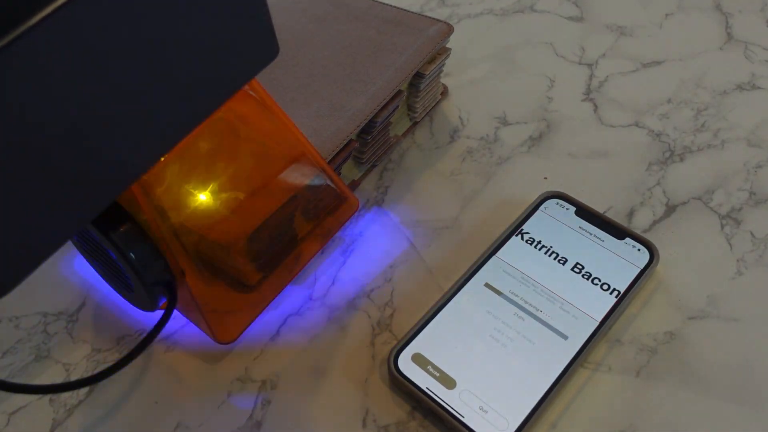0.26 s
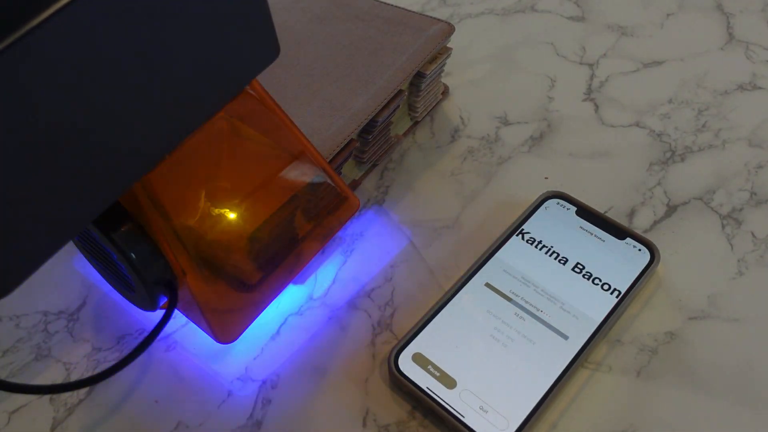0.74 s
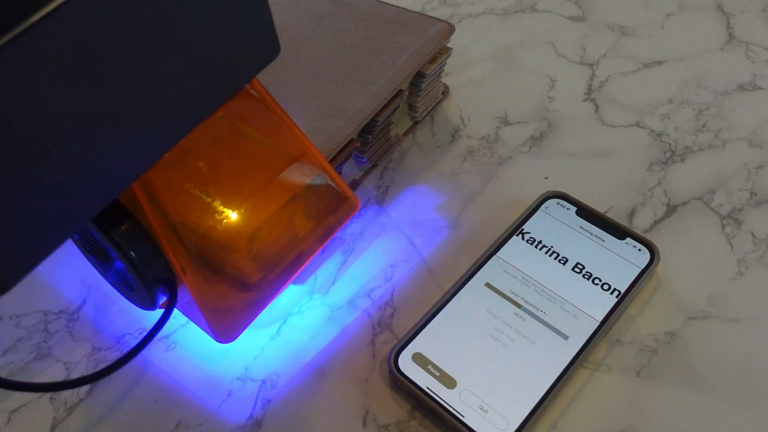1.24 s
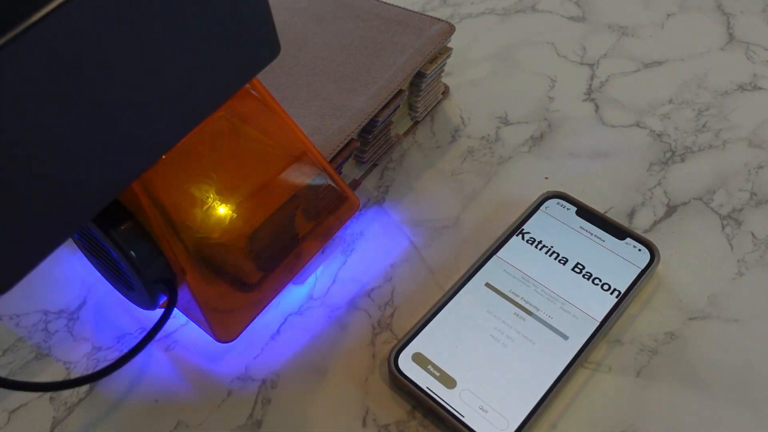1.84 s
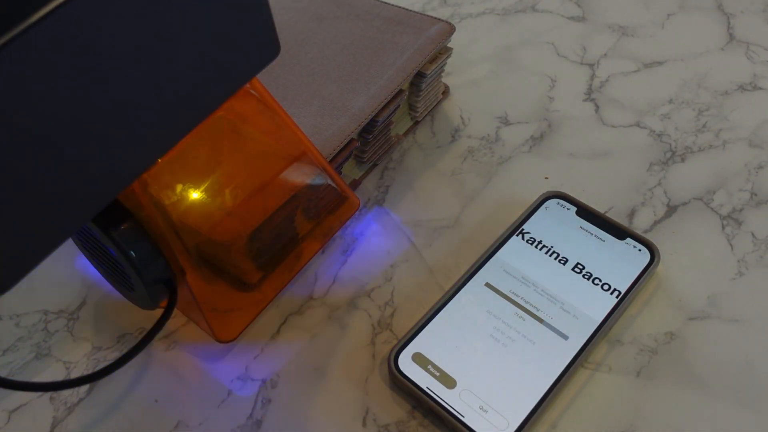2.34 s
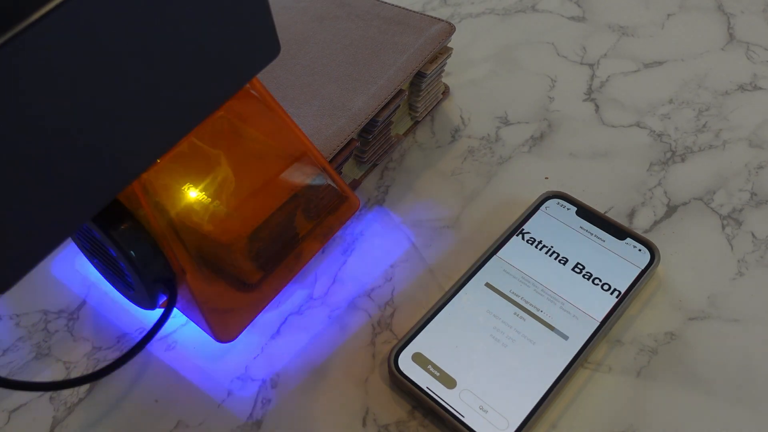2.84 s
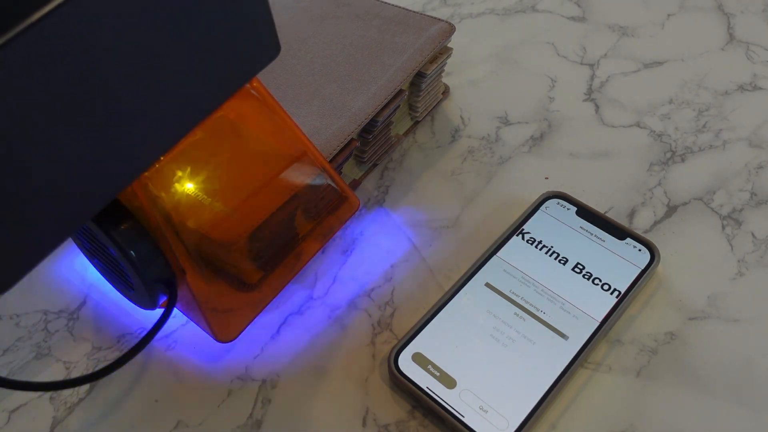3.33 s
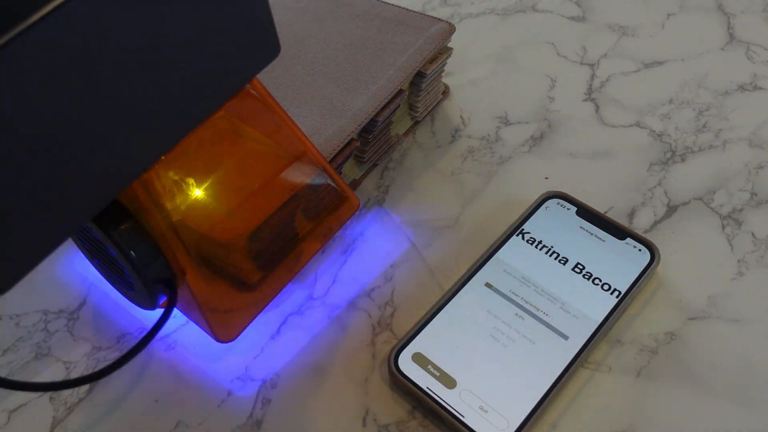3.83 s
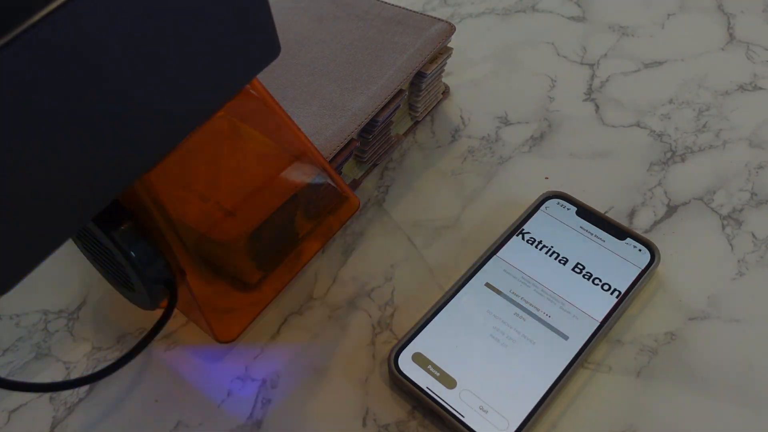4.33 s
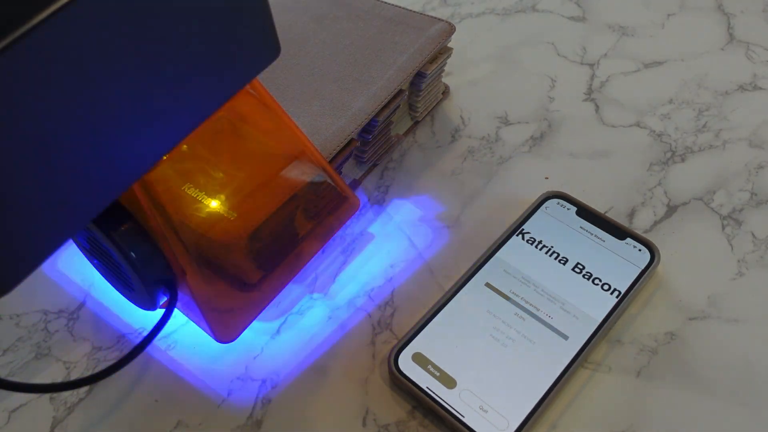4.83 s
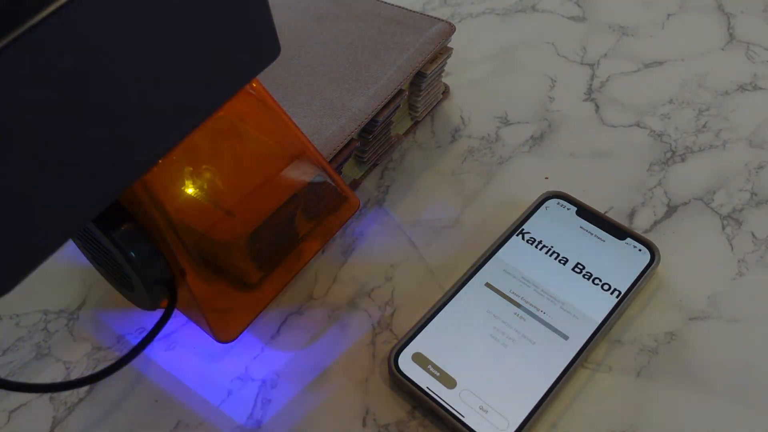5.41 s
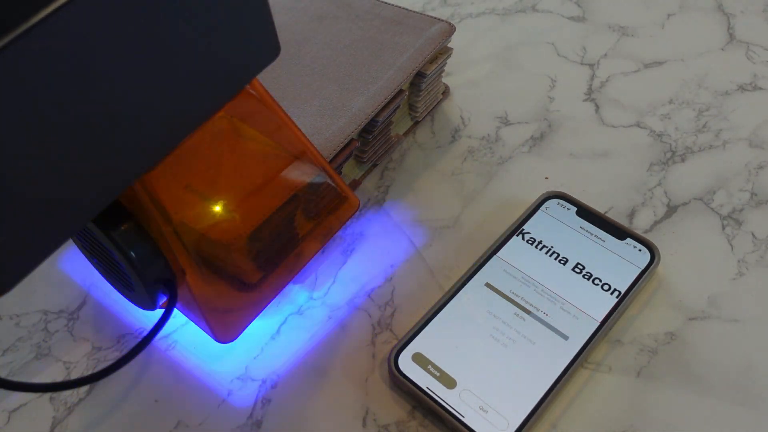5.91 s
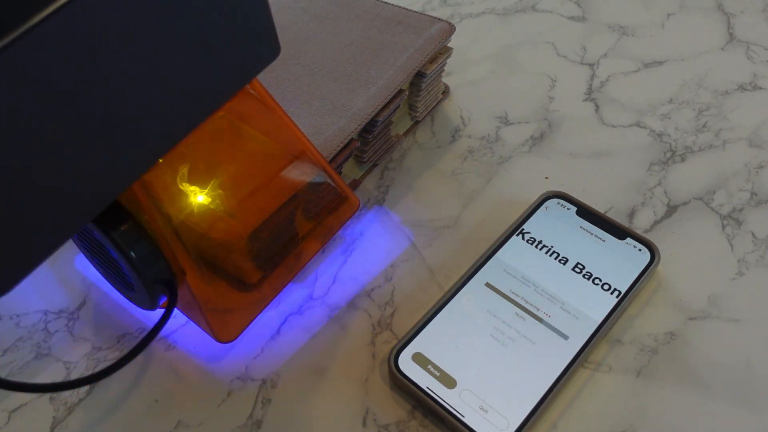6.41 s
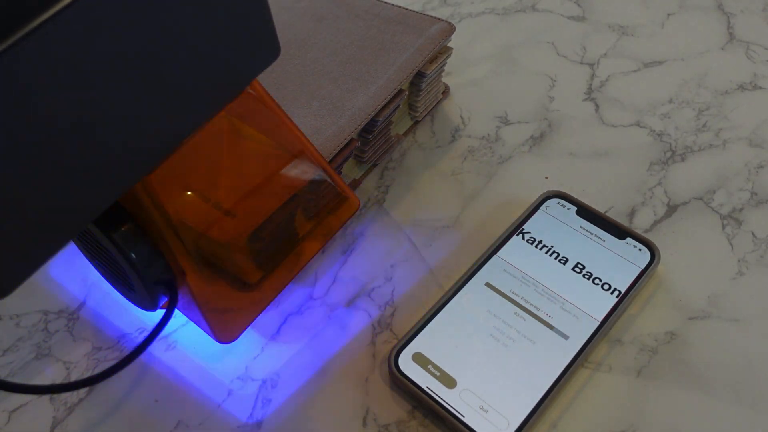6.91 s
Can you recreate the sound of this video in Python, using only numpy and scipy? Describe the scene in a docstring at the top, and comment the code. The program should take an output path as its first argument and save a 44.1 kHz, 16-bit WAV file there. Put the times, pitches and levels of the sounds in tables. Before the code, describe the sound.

A steady electric fan noise fills the stretch from start to end: a dominant thin whine, slightly beating and wavering, over a smooth, hollow hiss strongest around 3 to 4 kHz. A narrow tone near 1.2 kHz comes and goes irregularly in short pulses. No impacts or pauses. Captured close by indoors on a phone, dry, almost mono and thin in the lows.

```python
"""A counter top, heard from close by: a small desktop laser engraver at work. Two fast little cooling fans
whine at multiples of their drifting shaft speeds, as sines locked to each rotor's angle. Under them is the
hiss of their air, noise coloured by the resonances of the housing; a narrow band near 1163 Hz rises and falls
unevenly, and a faint low hum holds steady. The microphone is a phone's, almost in mono, without bass."""
import sys
import numpy as np
from scipy import signal
from scipy.fft import rfft, irfft, next_fast_len
from scipy.io import wavfile
from scipy.ndimage import uniform_filter1d, map_coordinates

SR = 44100
rng = np.random.default_rng(int(sys.argv[2]) if len(sys.argv) > 2 else 0)


def store_wav(level_fs):
    """Save 16-bit WAV to argv[1]."""
    pcm = np.round(np.clip(np.atleast_2d(level_fs), -1, 1) * 32767)
    wavfile.write(sys.argv[1], SR, pcm.T.astype(np.int16))


N = 315711
T = np.arange(N) / SR  # time of each sample, s


def amp(db):
    """Gain of a level in dB."""
    return 10 ** (np.asarray(db) / 20)


def along(points, hz):
    """Read (frequency [Hz], value) points on a log frequency axis."""
    f, v = np.transpose(points)
    return np.interp(np.log(hz + 1), np.log(f + 1), v)


def curves(rows):
    """One value per sample for each column after the time [s]."""
    s, *columns = np.transpose(rows)
    return [np.interp(T, s, column) for column in columns]


def wobble(rate):
    """A smooth random curve through normal random knots, rate knots a second."""
    knots = rng.standard_normal(int(N * rate / SR) + 4)
    return map_coordinates(knots, [np.arange(N) * rate / SR])


def filtered(x, response):
    """Multiply the spectrum of x by a response of frequency [Hz]."""
    m = next_fast_len(N + 8192)  # padded, so that tails do not wrap round
    spectrum = rfft(x, m) * response(np.fft.rfftfreq(m, 1 / SR))
    return irfft(spectrum, m)[..., :N]


def port_phases(hz):
    """Phases [radians] for the left and right ports: a tone reaches the left port a little later."""
    # phase lag between the ports: (frequency [Hz], lag [radians])
    port_lag = [(600, .1), (1160, .35), (1450, .18), (1860, .03), (2070, 0.038), (8000, 0.0087)]
    return along(port_lag, hz) * np.array([[-.5], [.5]])


def hum():
    """A faint low tone that hardly moves: a steady sine whose level wanders slightly."""
    # the hum ahead of the phone's bass cut: (frequency [Hz], middle level [dB])
    hz, level_db = (178.5, -100)
    return np.sqrt(2) * amp(level_db + wobble(3)) * np.sin(2 * np.pi * hz * T)


def colour(hz):
    """Gain for unit white noise: the broad power of the air plus the power of each resonance."""
    # broad colour of the air, ahead of the hiss gain: (frequency [Hz], density [dB per Hz])
    broad_air = [(90, -145), (140, -140.0), (230, -111.5), (400, -102.0), (800, -91.5), (1600, -92.0),
                 (2500, -91.0), (4400, -87), (5200, -95.1), (8100, -91.1), (9500, -96.5), (10500, -98.0),
                 (13000, -98.4), (15800, -103.4)]
    # resonances of housing and ducts, driven by the air, ahead of the hiss gain:
    # (centre [Hz], full width at 0.35 of the peak power [Hz], peak density [dB per Hz])
    housing = [(424, 28, -99.0), (917, 61, -84.7), (1165, 55, -83), (1270, 50, -91), (1392, 65, -83.5),
               (1483, 63, -85.5), (1704, 53, -83.5), (1803, 90, -82.6), (2053, 99, -83.4),
               (2211, 95, -83.2), (2358, 84, -84.3), (2667, 139, -82.9), (2852, 108, -77.0),
               (3034, 106, -80.9), (3207, 107, -78.5), (3396, 116, -76.5), (3515, 93, -73.6),
               (3659, 97, -76.5), (3774, 127, -78.0), (3985, 180, -83.1), (4730, 33, -92.8),
               (5826, 346, -93.7), (6188, 72, -88.2), (6449, 154, -88.5), (6703, 225, -83.7),
               (7033, 270, -85.6), (7381, 378, -89.5), (8720, 522, -95.3), (11472, 644, -93.9),
               (12379, 707, -93.1)]
    skirt = 1.5  # exponent: steeper flanks than a simple resonance
    power = amp(along(broad_air, hz)) ** 2
    for centre, width, peak_db in housing:
        detuning = 2 * (hz - centre) / width
        power = power + amp(peak_db) ** 2 / (1 + detuning ** 2) ** skirt
    return np.sqrt(power * SR / 2)


def air(uneven_db, gust_db):
    """Hiss with slight random unevenness of level over frequency and time; a small part differs by port."""
    # the part of the hiss that differs between the ports, ahead of the hiss gain:
    # (frequency [Hz], density [dB per Hz])
    apart = [(100, -130), (200, -118), (400, -108), (700, -102), (1450, -100), (1800, -112), (2400, -114),
             (2850, -100), (3500, -110), (4200, -128), (6000, -122), (6750, -105), (7500, -122),
             (15800, -132)]
    z = signal.stft(rng.standard_normal((2, N)), nperseg=512)[2]
    # random level field, smoothed over 8 bins and 8 frames
    field = uniform_filter1d(rng.standard_normal(z.shape[1:]), size=8, axis=0)
    field = uniform_filter1d(field, size=8, axis=1)
    uneven = z * amp(uneven_db * field / field.std())
    pair = signal.istft(uneven, nperseg=512)[1][:, :N]
    pair = pair * amp(gust_db * wobble(14))  # the whole stream shivers together

    def mid_and_side(hz):
        return np.array([colour(hz), amp(along(apart, hz)) * np.sqrt(SR / 2)])

    mid, side = filtered(pair, mid_and_side)
    return np.array([mid + side, mid - side])


def echoes(x, db, count=8):
    """Weak copies off counter top and nearby things, 3 to 20 ms late, ripple the treble of the hiss."""
    delays = .003 + .017 * rng.random(count)  # s

    def response(hz):
        treble = hz ** 4 / (hz ** 4 + 4000 ** 4)
        copies = sum(np.exp(-2j * np.pi * hz * s) for s in delays)
        return 1 + amp(db) * treble * copies

    return filtered(x, response)


def narrow_band(hold_db):
    """A narrow band near 1163 Hz, its level rising and falling at random: a sine of wandering pitch."""
    # rises of the level; hold_db is added to each: (start [s], length [s], level [dB])
    rises = [(0.053, 0.094, -58), (0.223, 0.45, -60.5), (0.779, 0.189, -61), (1.047, 0.95, -61.5),
             (2.192, 0.05, -61), (2.346, 0.096, -59), (2.495, 0.23, -60.5), (2.853, 0.21, -59),
             (3.16, 0.087, -64), (3.345, 0.26, -60), (3.737, 0.12, -64), (3.99, 0.25, -58.5),
             (4.319, 0.076, -59), (4.435, 0.068, -64), (4.603, 0.074, -61), (4.732, 0.08, -66),
             (4.902, 0.23, -64), (5.163, 0.08, -63), (5.315, 0.35, -61), (5.824, 0.078, -64),
             (5.956, 0.11, -62), (6.125, 0.22, -61), (6.54, 0.074, -60), (6.652, 0.22, -63),
             (6.973, 0.16, -67)]
    centre_hz, waver_hz = 1163, 5  # middle of the band, and its slower wander
    edge_s, floor_db = 0.036, -77.5  # length of each fade; what sounds on between the rises
    risen = 0
    for start, length, level_db in rises:
        to_nearer_end = np.minimum(T - start, start + length - T)
        risen = risen + amp(level_db + hold_db) * np.clip(to_nearer_end / edge_s + .5, 0, 1)
    level = np.sqrt(2) * (amp(floor_db) + risen) * amp(2.1 * wobble(25))
    hz = centre_hz + waver_hz * wobble(8) + 4 * wobble(30)
    return level * np.sin(2 * np.pi * np.cumsum(hz) / SR + port_phases(centre_hz))


def shaft(speed_rows):
    """Speed [Hz] and angle [radians] of a rotor, whose inertia rounds every change."""
    speed = uniform_filter1d(curves(speed_rows)[0], size=SR // 10)
    return speed, 2 * np.pi * np.cumsum(speed) / SR


def tone(rotor, multiple, db, flutter_db, flutter_rate):
    """A sine locked to the shaft, fluttering in the turbulent inflow."""
    speed, turn = rotor
    level = np.sqrt(2) * amp(db + flutter_db * wobble(flutter_rate))
    start_phase = 2 * np.pi * rng.random()
    return level * np.sin(multiple * turn + port_phases(multiple * speed.mean()) + start_phase)


def fan_tones(rotor, orders):
    """The tones of a fan follow its shaft speed; some also change level with it."""
    drift = rotor[0] - rotor[0].mean()
    return sum(tone(rotor, multiple, db + slope * drift, flutter_db=1.37, flutter_rate=7)
               for multiple, db, slope in orders)


def high_fan():
    """The higher fan: its shaft speed drifts and carries all its tones along."""
    # shaft speed: (time [s], speed [Hz])
    high_speed = [(0.0, 228.51), (0.55, 229.32), (1.2, 229.2), (1.65, 229.49), (2.25, 229.5), (2.65, 228.9),
                  (3.0, 229.2), (3.3, 229.06), (3.62, 229.36), (4.2, 228.71), (4.6, 229.34), (5.1, 229.19),
                  (5.65, 229.47), (6.25, 229.49), (6.8, 228.88), (7.16, 229.13)]
    # tones: (multiple of the shaft speed, level at mean speed [dB], gain with extra speed [dB per Hz])
    high_orders = [(2, -88.3, 0), (8, -59.3, 0.7), (10, -65.5, 0), (20, -63.3, 6.9), (24, -76.1, 0),
                   (30, -66.7, 7.4), (32, -63.2, -0.7), (40, -77.5, 0), (56, -82.5, 0)]
    return fan_tones(shaft(high_speed), high_orders)


def whine(rotor):
    """The three loudest tones of the lower fan follow the speed and swell slowly."""
    # multiple of the shaft speed: (gain with extra speed [dB per Hz], flutter [dB])
    loudest = {7: (4.2, .9), 9: (-1.4, 0.71), 10: (.5, 0.86)}
    # slow swell at the mean speed: (time [s], 7th multiple [dB], 9th before its dips [dB], 10th [dB])
    swell = [(0, -58, -50, -54), (1.0, -58.5, -49.5, -53.5), (2.0, -59, -49, -53.5), (2.5, -59, -48.5, -52),
             (3.3, -59, -48.8, -54), (3.9, -60, -46.5, -53.5), (4.5, -59.5, -49, -56.5),
             (4.85, -59, -49, -55), (5.2, -58, -48.5, -56), (5.5, -59, -48, -53.5), (6.5, -59, -48.5, -53),
             (7.0, -61.5, -49, -60.5), (7.16, -59, -49.5, -53)]
    # the 9th multiple dips briefly: (time [s], depth [dB])
    dips = [(.33, 3), (.76, 3), (1.72, 6), (3.32, 3.5), (4.88, 3), (6.75, 3.5)]
    dip_s = 0.035  # half width of a dip, where 1/e of its depth is left
    drift = rotor[0] - rotor[0].mean()
    seventh, ninth, tenth = curves(swell)
    ninth = ninth - sum(depth * np.exp(-((T - s) / dip_s) ** 2) for s, depth in dips)
    tones = 0
    for db, (multiple, (slope, flutter_db)) in zip((seventh, ninth, tenth), loudest.items()):
        tones = tones + tone(rotor, multiple, db + slope * drift, flutter_db, flutter_rate=10)
    return tones


def low_fan():
    """The lower fan: one drifting shaft drives the loud whine and the weaker tones."""
    # shaft speed: (time [s], speed [Hz])
    low_speed = [(0.0, 206.24), (0.6, 207.11), (1.0, 206.9), (1.4, 206.02), (2.0, 206.13), (2.55, 207.0),
                 (3.15, 206.7), (3.45, 206.87), (3.85, 206.08), (4.8, 206.78), (5.4, 205.8), (5.8, 205.87),
                 (6.2, 206.96), (6.6, 206.69), (7.0, 205.83), (7.16, 205.82)]
    # weaker tones: (multiple of the shaft speed, level at mean speed [dB], gain with extra speed [dB per Hz])
    low_orders = [(3, -82.4, 0), (5, -74.6, 1.3), (8, -72.6, 0), (11, -65.1, 0), (12, -74.1, 0),
                  (28, -81.3, 0)]
    rotor = shaft(low_speed)
    return whine(rotor) + fan_tones(rotor, low_orders)


def scene():
    """The hum, the air, the narrow band and both fans, added at the two ports."""
    hiss = echoes(air(uneven_db=.5, gust_db=0.1), db=-28)
    return hum() + amp(0.26) * hiss + narrow_band(hold_db=-2) + high_fan() + low_fan()


def record(dry):
    """The phone cuts the bass steeply and keeps nothing above its band limit."""
    bass_hz, top_hz = 150, 15760
    return filtered(dry, lambda hz: (hz < top_hz) * hz ** 4 / (hz ** 4 + bass_hz ** 4))


dry = scene()
out = record(dry)
store_wav(out)
```